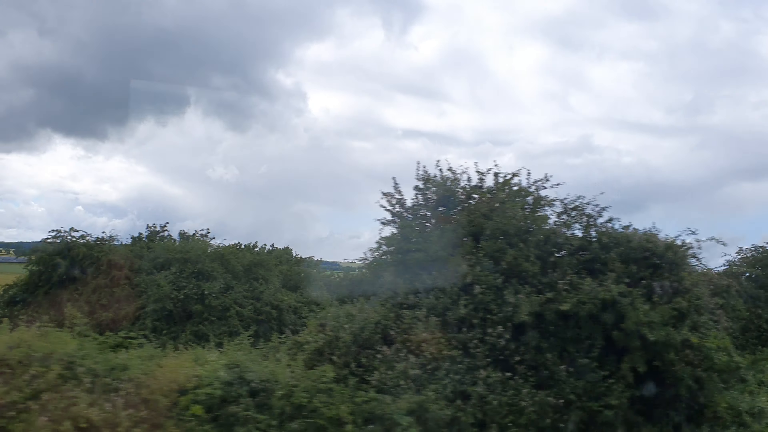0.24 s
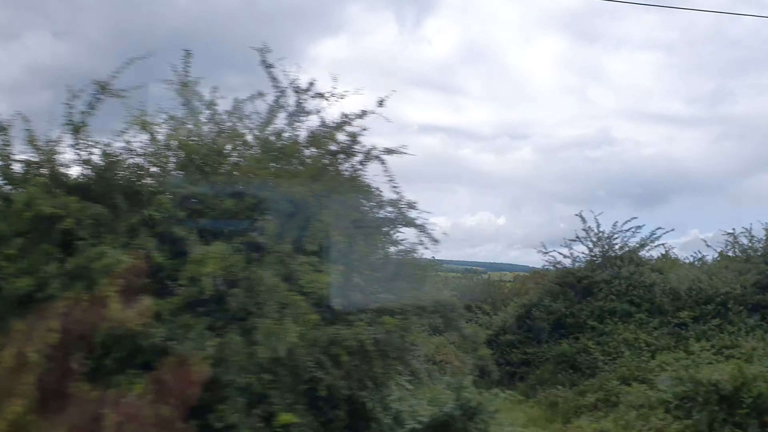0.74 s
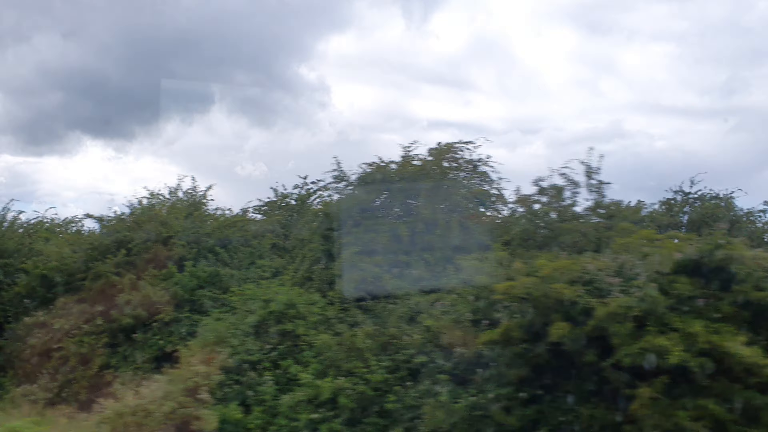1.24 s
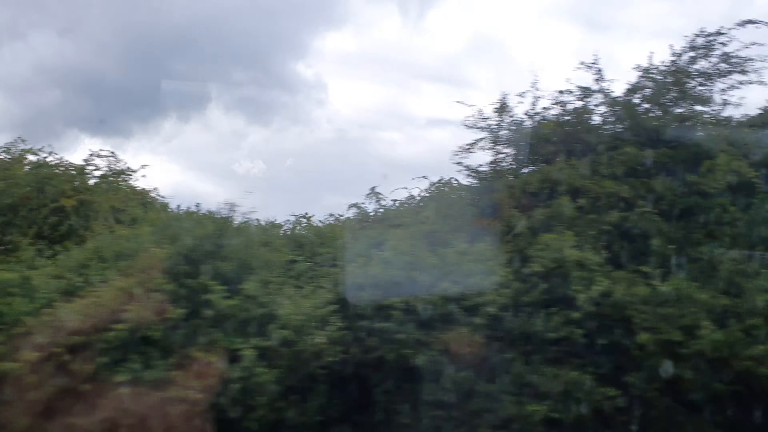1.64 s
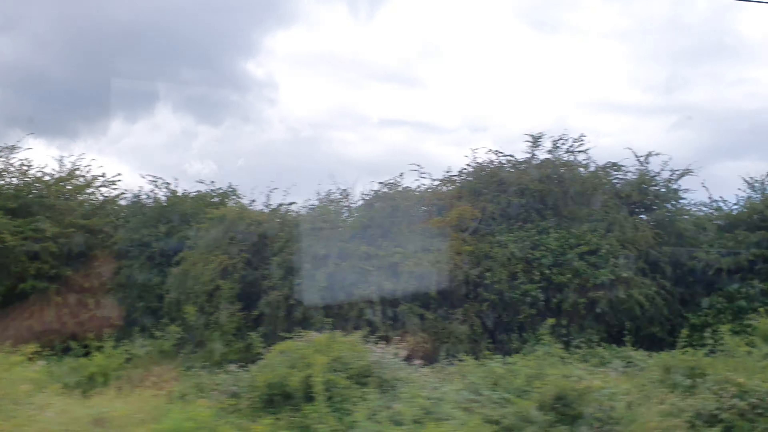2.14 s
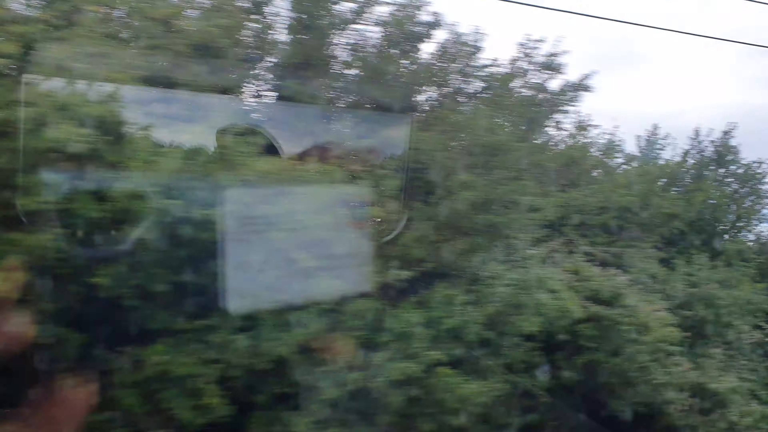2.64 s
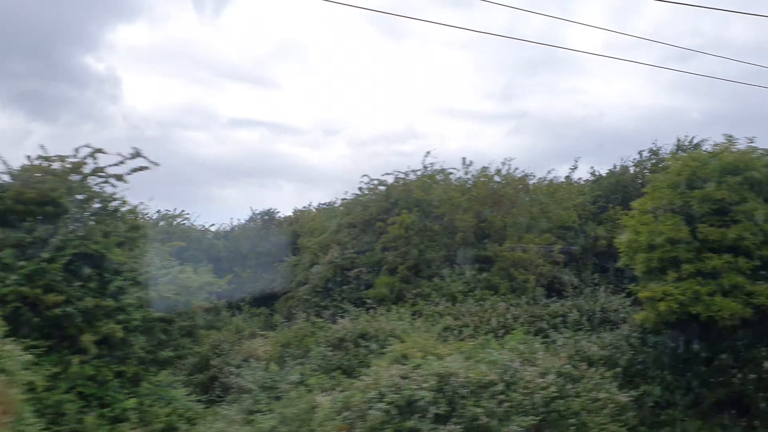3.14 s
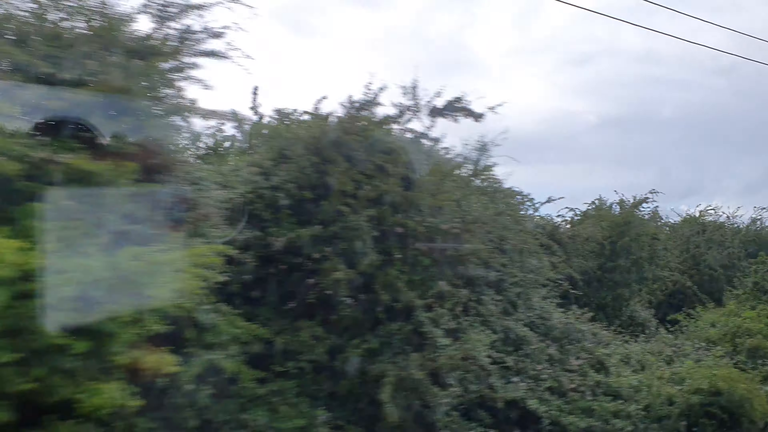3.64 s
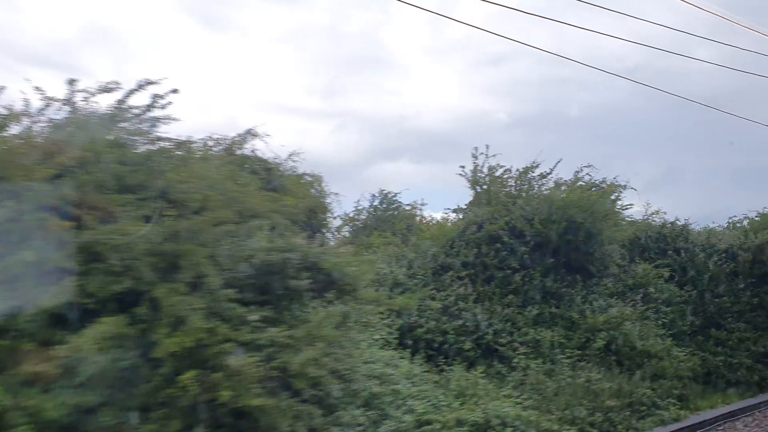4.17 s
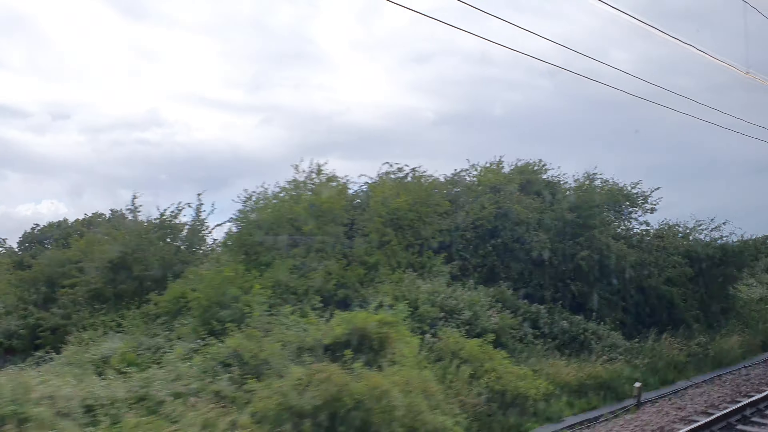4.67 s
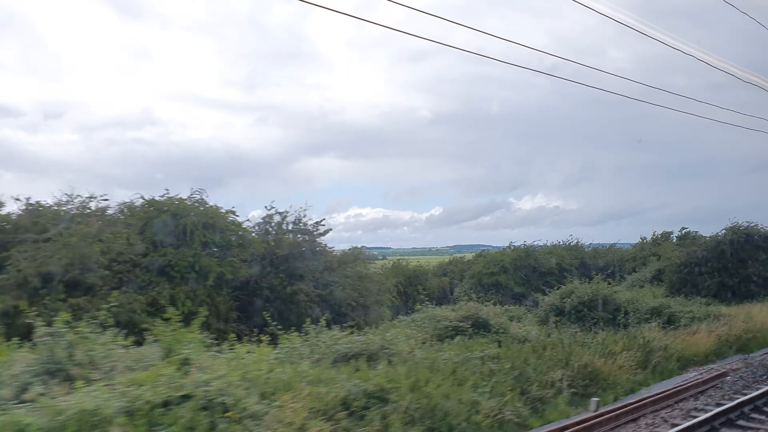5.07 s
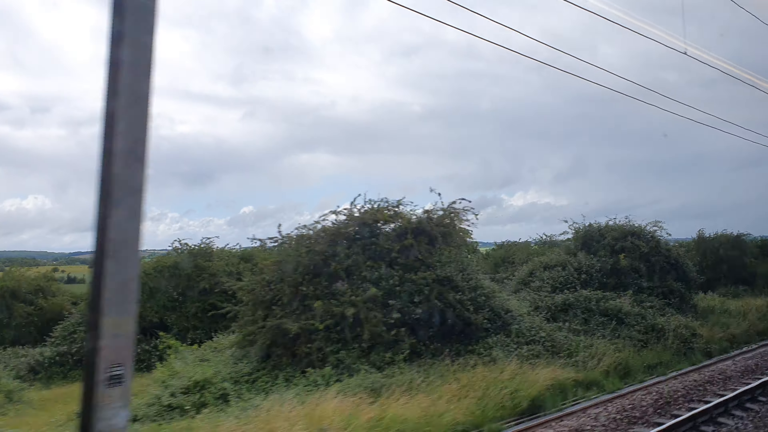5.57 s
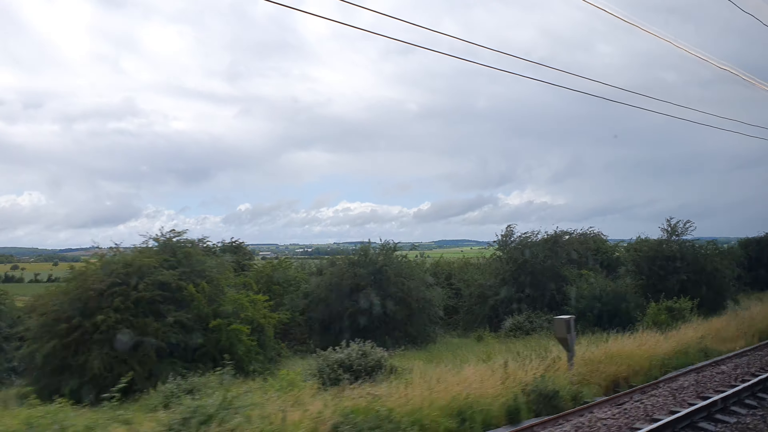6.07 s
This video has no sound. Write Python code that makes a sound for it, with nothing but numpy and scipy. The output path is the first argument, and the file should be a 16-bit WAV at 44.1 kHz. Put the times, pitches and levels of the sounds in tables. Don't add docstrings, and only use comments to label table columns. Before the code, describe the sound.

Inside a fast passenger carriage, deep wheel rumble and steady floor hum, faint motor whine stepping up in pitch, slight bag crinkle and panel ticks.

```python
import sys
import numpy as np
from scipy import signal
from scipy.fft import rfft, irfft, next_fast_len
from scipy.io import wavfile
from scipy.ndimage import uniform_filter1d, map_coordinates

SR = 44100
rng = np.random.default_rng(int(sys.argv[2]) if len(sys.argv) > 2 else 0)


def volts(x):
    e = np.asarray(x, float) / 20
    return 10 ** e


def materialize(psi):
    bounded = np.clip(np.atleast_2d(psi).T, -1, 1)
    quanta = np.round(bounded * 32767).astype(np.int16)
    wavfile.write(sys.argv[1], SR, quanta)


N = 278271

# t/s, level/dB
ROUGHNESS = [(0, 0.5), (.2, -1), (.48, 0), (1, -1), (1.35, 0), (1.8, 2), (2.1, 0), (2.45, 1.5), (2.8, .5),
             (3.3, 2.5), (3.67, -1), (4.25, -1.5), (4.7, 0.5), (5.1, 0), (5.5, 1), (5.87, -1.5),
             (6.12, 1.5), (6.31, 0.5)]


def unit(x):
    return x / np.sqrt(np.mean(x ** 2) + 1e-20)


def along(points, hz):
    f, v = np.transpose(points)
    return np.interp(np.log(hz + 1), np.log(f + 1), v)


def curves(rows):
    s, *cols = np.transpose(rows)
    return [np.interp(np.arange(N) / SR, s, c) for c in cols]


def wobble(rate_hz):
    return map_coordinates(rng.standard_normal(400), [np.arange(N) * np.clip(rate_hz, 0, 50) / SR])


def filtered(x, response):
    n = x.shape[-1]
    m = next_fast_len(n + 8192)
    return irfft(rfft(x, m) * response(np.fft.rfftfreq(m, 1 / SR)), m)[..., :n]


def resonance(hz, centre_hz, width_hz):
    return 1j * hz * width_hz / (centre_hz ** 2 - hz ** 2 + 1j * hz * width_hz)


def rush(gain, patchy_db):
    # f/Hz, correlation
    likeness = [(30, 1), (60, 0.97), (120, 1), (180, 0.95), (320, .74), (570, 0.28), (990, 0.02),
                (3050, 0.064), (15000, .05)]
    z = signal.stft(rng.standard_normal((2, N)), nperseg=512)[2]
    field = uniform_filter1d(rng.standard_normal(z.shape[1:]), size=5, axis=0)
    field = uniform_filter1d(field, size=12, axis=1)
    pair = signal.istft(z * volts(patchy_db * unit(field)), nperseg=512)[1][:, :N]

    def mid_side_gain(hz):
        angle = np.arccos(np.clip(along(likeness, hz), -1, 1)) / 2
        return gain(hz) * [np.cos(angle), np.sin(angle)]

    mid, side = filtered(pair, mid_side_gain)
    return unit(np.array([mid + side, mid - side]))


def tone(hz, lead_rad, drift_hz, flutter_db):
    phase = 2 * np.pi * (np.cumsum(hz + drift_hz * wobble(7)) / SR + rng.random())
    flutter = volts(flutter_db * np.array([wobble(4), wobble(2.8)]))
    return np.sqrt(2) * flutter * np.sin(phase + np.array([[lead_rad / 2], [-lead_rad / 2]]))


def singing_rail():
    # t/s, centre f/Hz, level/dB
    rail_band = [(0, 1990, -57), (1.2, 1980, -57), (2.2, 1940, -55), (3.2, 1925, -54.5), (4, 1915, -55.5),
                 (5, 1915, -53.5), (6.31, 1915, -54)]
    centre_hz, sing_db = curves(rail_band)
    top_hz, bottom_hz = centre_hz.max(), centre_hz.min()
    share = (centre_hz - bottom_hz) / (top_hz - bottom_hz + 1)
    high = rush(lambda hz: resonance(hz, top_hz, width_hz=90) ** 2, patchy_db=2.5)
    low = rush(lambda hz: resonance(hz, bottom_hz, width_hz=120) ** 2, patchy_db=2.5)
    return volts(sing_db + 1.3 * wobble(4.1)) * (np.sqrt(share) * high + np.sqrt(1 - share) * low)


def wheels():
    # f/Hz, level/dB per Hz
    rumble_spectrum = [(8, -57.5), (18, -0.5), (30, -4.5), (42, 0), (52, -1), (62, 3.5), (76, 2),
                       (96, -0.5), (118, -1.5), (146, -4.5), (160, -13), (185, -17.5), (240, -43.5),
                       (440, -120)]
    body_spectrum = [(82, -34), (140, -5), (156, -8), (187, -14.5), (232, -11.5), (258, -15), (306, -14.5),
                     (343, -20), (380, -20), (437, -24.5), (615, -30), (662, -39), (800, -46.5),
                     (1040, -68), (1760, -120)]
    roar_spectrum = [(350, -26.5), (600, -6.5), (689, -6.5), (768, -9.5), (907, -13), (1050, -13),
                     (1300, -15), (1690, -19.5), (1900, -15.5), (2150, -18.5), (3400, -34.5), (4420, -61.5),
                     (7480, -120)]
    rough_db, = curves(ROUGHNESS)
    rumble_db = -16.5 + 1.1 * rough_db + 0.6 * wobble(3)
    body_db = -24.5 + 1.1 * rough_db + 0.4 * wobble(1.7)
    roar_db = -40 + 0.96 * rough_db + 0.33 * wobble(14)
    rumble = volts(rumble_db) * rush(lambda hz: volts(along(rumble_spectrum, hz)), patchy_db=0.72)
    body = volts(body_db) * rush(lambda hz: volts(along(body_spectrum, hz)), patchy_db=1.46)
    roar = volts(roar_db) * rush(lambda hz: volts(along(roar_spectrum, hz)), patchy_db=0.8)
    return rumble + body + roar + singing_rail()


def floor_hum():
    # t/s, level/dB
    plate_swing = [(0, 3), (.3, -2), (.55, 1), (1, -3), (1.4, 0), (1.8, -1), (2.45, 2.5), (2.8, 0.5),
                   (3.15, 2), (3.7, 1), (4.2, -0.5), (4.5, -0.5), (5.1, -0.5), (5.6, 2), (6.31, -0.5)]
    rough_db, = curves(ROUGHNESS)
    swing_db, = curves(plate_swing)
    boom = rush(lambda hz: resonance(hz, centre_hz=125.66, width_hz=26) ** 2, patchy_db=-1.5)
    second = rush(lambda hz: resonance(hz, centre_hz=229.3, width_hz=21) ** 2, patchy_db=0.0)
    line = tone(np.full(N, 126.74), lead_rad=0.05, drift_hz=0.1, flutter_db=0.4)
    first = volts(swing_db) * (volts(-19) * line + volts(-22.5) * boom)
    return first + volts(-36 + 0.9 * rough_db) * second


def drive_stage(carrier, stage, partials):
    carrier_hz, = curves(carrier)
    load_db, uneven_db = curves(stage)
    out = 0
    for multiple, offset_hz, db, lead_rad in partials:
        level_db = db + (uneven_db if multiple > 1 or offset_hz > 0 else load_db)
        partial = tone(multiple * carrier_hz + offset_hz, lead_rad, drift_hz=1.7 * multiple, flutter_db=2.5)
        out = out + volts(level_db) * partial
    return out


def drive():
    # t/s, f/Hz
    low_carrier = [(0, 670.5), (2.4, 675), (4, 675.5)]
    high_carrier = [(4, 886), (6.31, 887)]
    # t/s, load level/dB, unevenness level/dB
    low_stage = [(0, -39, -58.5), (.25, -59.5, -60.5), (.5, -42.5, -57), (1.15, -47, -59),
                 (2.45, -40.5, -57), (2.7, -54, -56.5), (3.2, -47.5, -55), (3.4, -47, -66.5),
                 (4.1, -46, -63.5)]
    high_stage = [(4, -55, -58), (4.4, -47, -62.5), (4.8, -50, -62), (4.95, -55.5, -56.5),
                  (5.3, -48, -53.5), (5.65, -52, -54.5), (6.1, -44.5, -52), (6.31, -55.5, -56)]
    # carrier multiple, sideband offset/Hz, level/dB, left lead/rad
    low_partials = [(1, 0, -3, 1.3), (1, -12, -5, .3), (1, 88, -1, .5), (2, 0, 3, 2.2), (3, 0, 1, 1.5),
                    (3, -12, -4, .4)]
    high_partials = [(1, 0, -1, 1), (1, -12, -6, .5), (1, -92, -8, 2.5), (1, 93, -1, .5), (2, 0, -3, 2)]
    switch_s, handover_s = 4.05, 0.052
    after = np.clip((np.arange(N) / SR - switch_s) / handover_s, 0, 1)
    low = drive_stage(low_carrier, low_stage, low_partials)
    high = drive_stage(high_carrier, high_stage, high_partials)
    return (1 - after) * low + after * high


def fan():
    # f/Hz, level/dB
    fan_lines = [(893, -65), (1852, -63), (285, -43), (1930, -66)]
    return sum(volts(db) * tone(np.full(N, hz), lead_rad=0.22, drift_hz=1.3, flutter_db=2.5)
               for hz, db in fan_lines)


def air():
    # f/Hz, level/dB per Hz
    hiss_spectrum = [(1500, -62), (2900, -11.5), (3550, 2.5), (4200, -2.5), (5800, -8), (7400, -12.5),
                     (9300, -19), (15500, -21)]
    level_db = -61.0 + 0.6 * wobble(6) + 0.61 * wobble(1.1)
    return volts(level_db) * rush(lambda hz: volts(along(hiss_spectrum, hz)), patchy_db=0.9)


def bag():
    # t/s, level/dB, rise/s, tilt/(dB per octave)
    crinkles = [(.335, -64.5, .015, -2), (.709, -64.5, 0.0011, 8), (1.001, -68.5, .02, 6),
                (1.181, -69.5, 0.011, 2.5), (1.419, -70, .016, -3), (1.504, -63.5, .0034, -5),
                (1.561, -53, 0.003, 1.5), (1.585, -50, .0033, -7.5), (1.636, -44.5, .0012, -1.5),
                (1.755, -48.5, .012, -6), (1.777, -56, .034, -7.5), (1.828, -42, .006, 0),
                (1.862, -46.5, .005, 0), (1.888, -53, .005, 0), (1.926, -50.5, .002, -2),
                (1.985, -59.5, 0.0044, 1.5), (2.445, -58, .018, -3), (2.59, -68.5, .007, 4.5),
                (3.03, -65.5, .04, 0), (3.2, -52.5, .0018, -6), (3.29, -67.5, .03, 1),
                (3.9, -69.5, .012, 6), (4.2, -69, .008, 3), (4.875, -64, .022, -0.5),
                (5.355, -65, 0.0092, 2), (5.44, -68, .008, 3.5), (5.61, -65, .018, 0.5),
                (5.785, -67, .005, -5.5), (6.061, -60.5, .025, -7)]
    # f/Hz, level/dB per Hz
    film_spectrum = [(500, -50), (1800, -6), (2800, 3), (4500, 1), (6000, 1), (8000, -2), (9500, -3),
                     (11500, 0), (13500, -2), (16000, -3)]
    out, t = np.zeros((2, N + SR)), np.arange(SR // 2) / SR
    knots_hz = np.linspace(0, SR / 2, 25)
    for s, db, rise_s, tilt_db in crinkles:
        clumps = unit(uniform_filter1d(rng.standard_normal(len(t)), size=60))
        snaps = rng.standard_normal((2, len(t))) * volts(3 * clumps)
        fold_db = 1.7 * rng.standard_normal(size=25)

        def colour(hz):
            tilted_db = along(film_spectrum, hz) + tilt_db * np.log2((hz + 1) / 8000)
            return volts(tilted_db + np.interp(hz, knots_hz, fold_db))

        hold_s, t60_s = 3.1 * rise_s, max(0.26 + 6 * rise_s, 0.02)
        decay = volts(-60 * np.maximum(t - hold_s, 0) / t60_s)
        swell = (1 - np.exp(-t / max(rise_s, 1e-4))) * decay
        out[:, round(s * SR):][:, :len(t)] += volts(db) * swell * unit(filtered(snaps, colour))
    return out[:, :N] * volts([[-0.4], [0.4]])


def film_snaps():
    # t/s, peak level/dB
    snap_events = [
        (0.3386, -55.5),
        (0.7088, -59.5),
        (1.504, -56),
        (1.5617, -47.5),
        (1.6362, -42.5),
        (1.926, -40),
        (3.2037, -51),
        (5.7844, -59),
        (6.0945, -53),
        (6.1618, -55.5),
    ]
    out, t = np.zeros((2, N + SR)), np.arange(SR // 10) / SR
    for s, db in snap_events:
        burst = rng.standard_normal((2, len(t))) * volts(-60 * t / 0.03)
        snap = filtered(burst, lambda hz: resonance(hz, centre_hz=6800, width_hz=7000) ** 2)
        out[:, round(s * SR):][:, :len(t)] += volts(db - 0.5) * snap
    return out[:, :N]


def panel():
    # t/s, peak level/dB, snap level/dB, t60/s, upper modes level/dB
    ticks = [
        (0.9782, -33, -13.5, 0.25, 1),
        (1.9898, -33, -17, 0.19, 0.5),
        (2.697, -39, -20, 0.18, -1.5),
        (4.9088, -44.5, -19, 0.3, 2),
        (5.608, -38.5, -22, 0.26, 2),
    ]
    # f/Hz, width/Hz, level/dB
    modes = [(2680, 700, 2), (3430, 700, -4.5), (4500, 810, -14), (5960, 1100, -21)]
    out, t = np.zeros((2, N + SR)), np.arange(SR // 2) / SR
    for s, db, snap_db, t60_s, upper_db in ticks:

        def mode_sum(hz):
            return sum((-1) ** k * volts(mode_db + k * upper_db) * resonance(hz, centre_hz, width_hz) ** 2
                       for k, (centre_hz, width_hz, mode_db) in enumerate(modes))

        decay = volts(-60 * t / t60_s) + volts(-13.0 - 60 * t / 0.7)
        shake = rng.standard_normal((2, len(t))) * (1 - np.exp(-t / 0.0004)) * decay
        ring = filtered(shake, mode_sum) * volts([[1.8], [-1.8]])
        burst = rng.standard_normal(len(t)) * volts(-60 * t / 0.018)
        snap = filtered(burst, lambda hz: resonance(hz, centre_hz=4800, width_hz=4000) ** 3)
        out[:, round(s * SR):][:, :len(t)] += volts(db + 2) * (ring + volts(snap_db + 8.5) * snap)
    return out[:, :N]


def scene():
    carriage = wheels() + floor_hum() + drive() + fan() + air()
    return carriage + bag() + film_snaps() + panel()


def top_cut(x):
    return signal.sosfilt(signal.butter(12, 15725, fs=SR, output="sos"), x)


def record(dry):
    # f/Hz, level/dB
    port_lean = [(30, 0), (160, -.4), (280, 1.4), (500, 1), (1000, 0), (2000, 2.2), (4000, .6), (8000, -.6),
                 (12000, -2.2)]
    fade_in_s, ceiling = 0.008, 0.9
    opened = dry * np.minimum(np.arange(N) / SR / fade_in_s, 1)
    ports = filtered(opened, lambda hz: volts(along(port_lean, hz) * [[0.5], [-0.5]]))
    rounded = ports / (1 + np.abs(ports / ceiling) ** 6) ** (1 / 6)
    return top_cut(rounded)


dry = scene()
out = record(dry)
materialize(out)
```